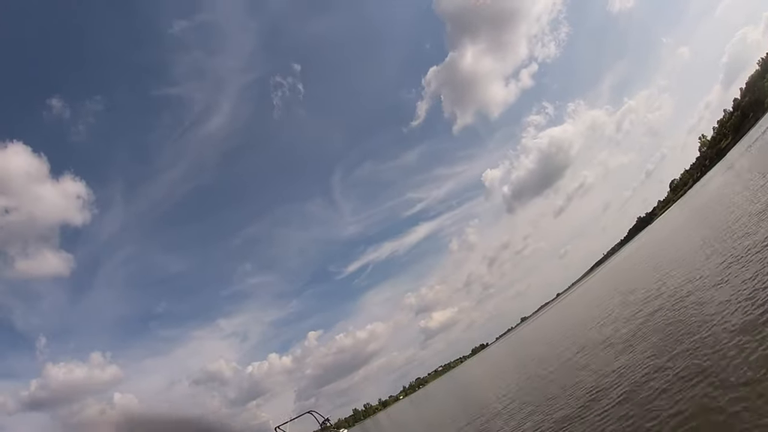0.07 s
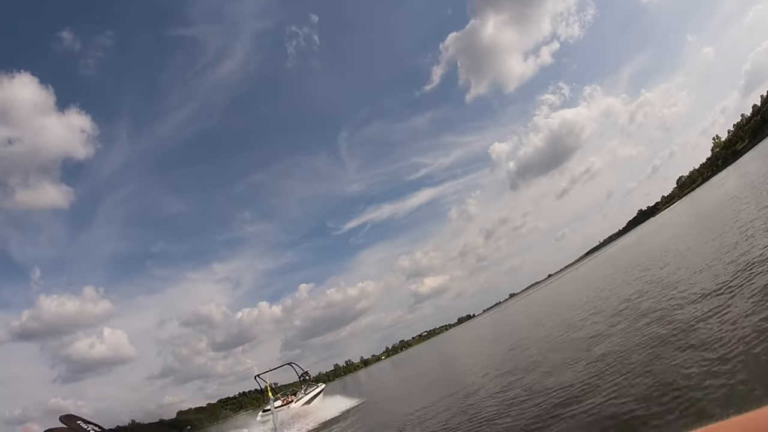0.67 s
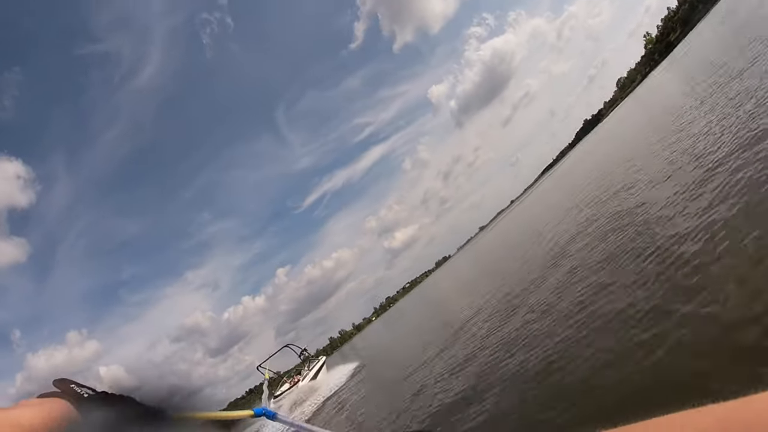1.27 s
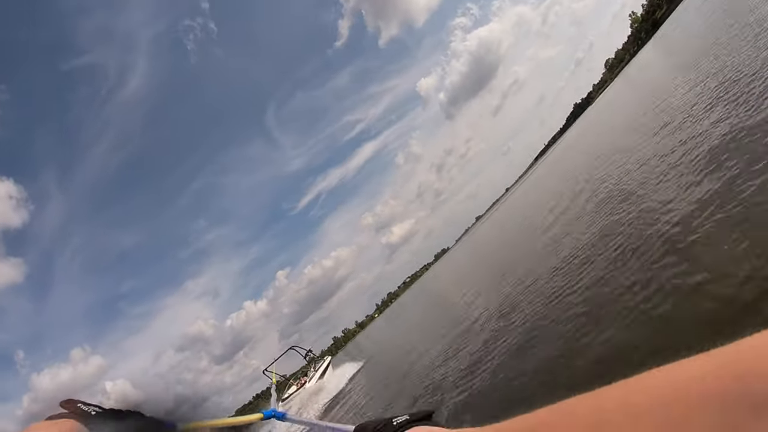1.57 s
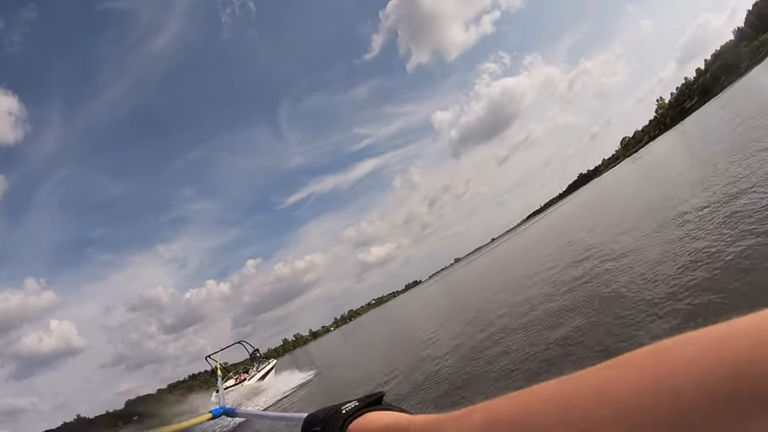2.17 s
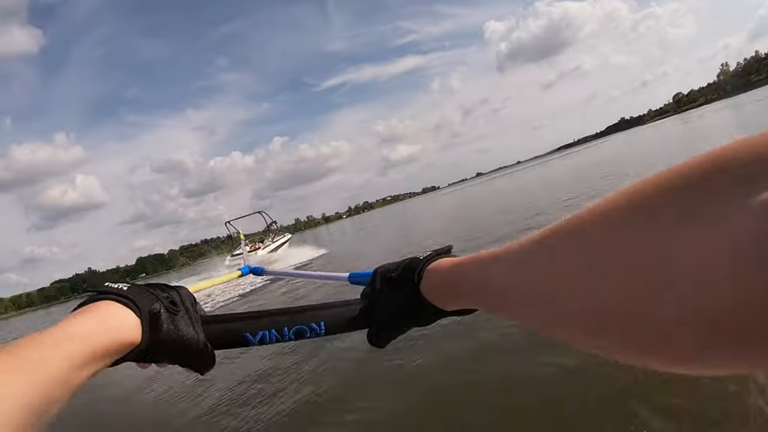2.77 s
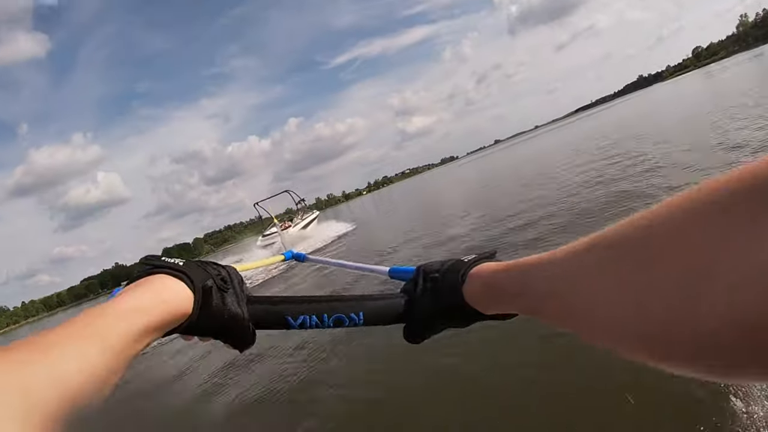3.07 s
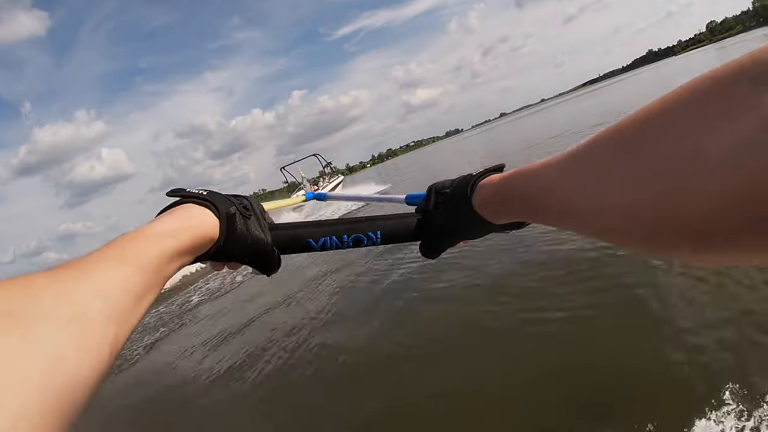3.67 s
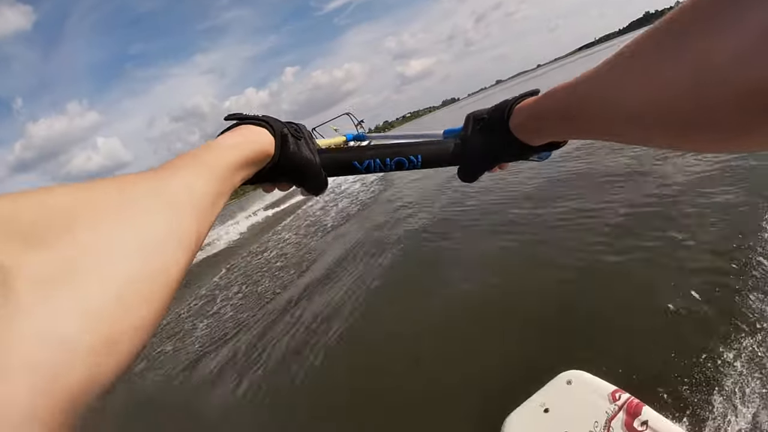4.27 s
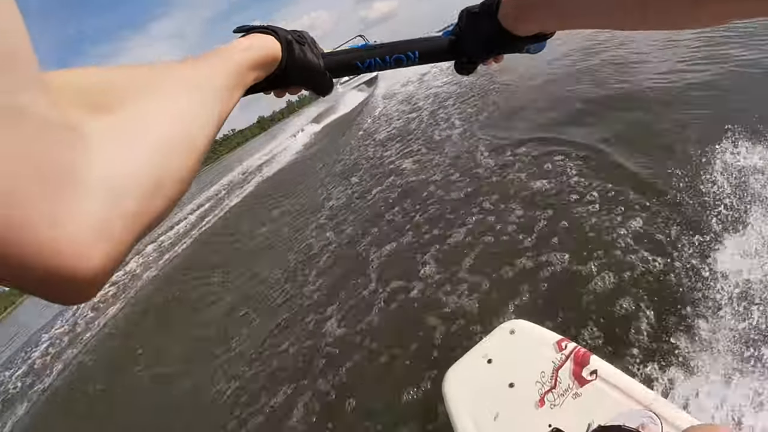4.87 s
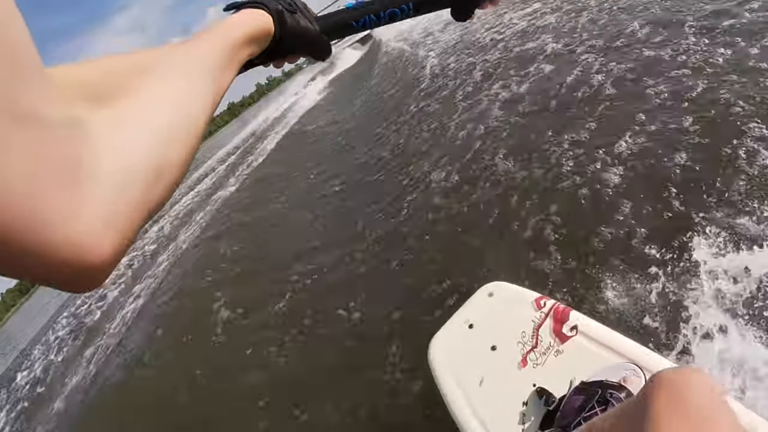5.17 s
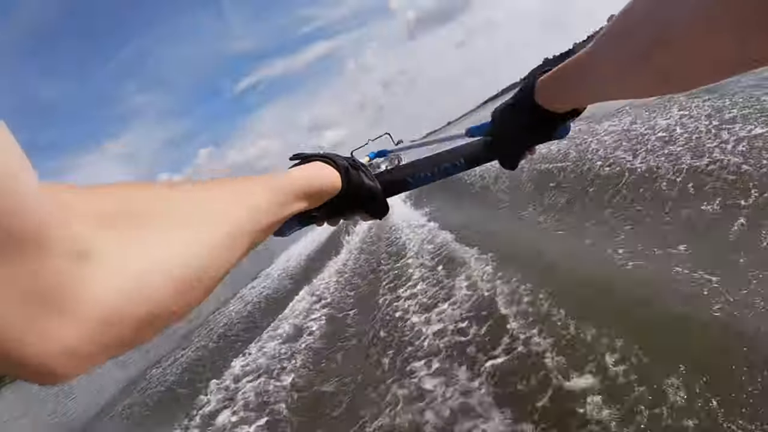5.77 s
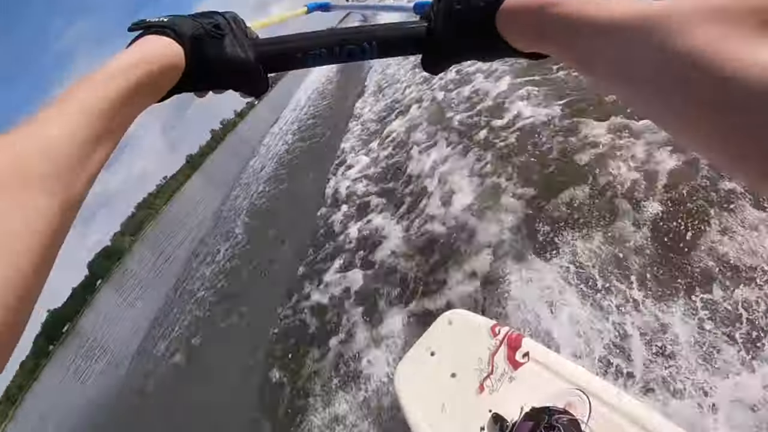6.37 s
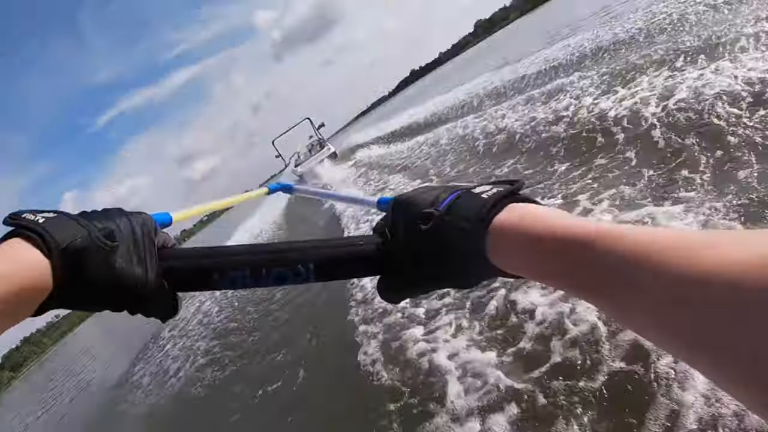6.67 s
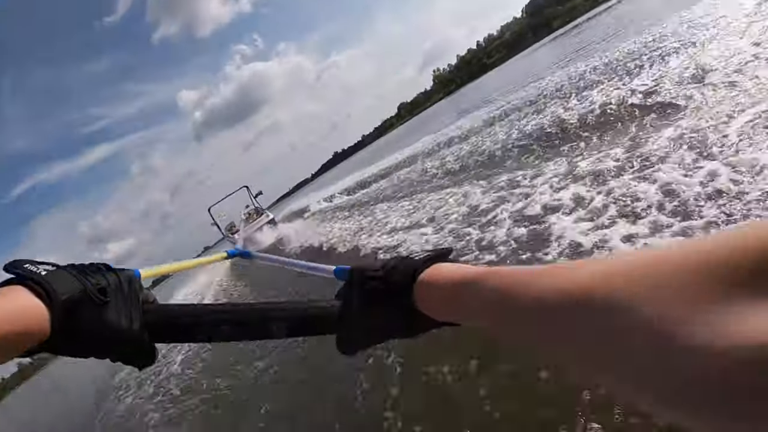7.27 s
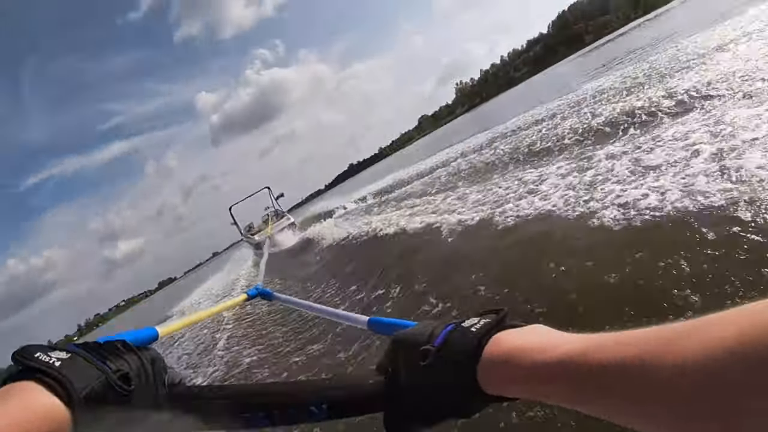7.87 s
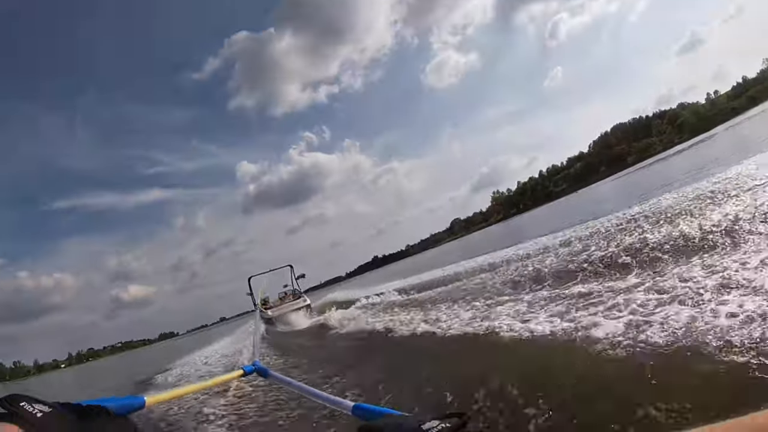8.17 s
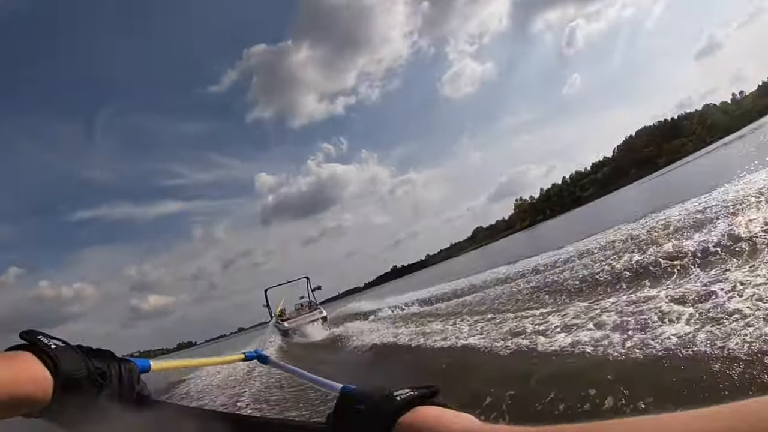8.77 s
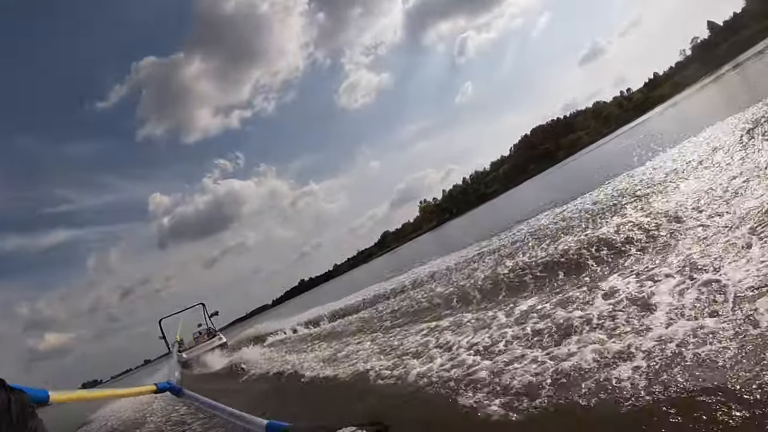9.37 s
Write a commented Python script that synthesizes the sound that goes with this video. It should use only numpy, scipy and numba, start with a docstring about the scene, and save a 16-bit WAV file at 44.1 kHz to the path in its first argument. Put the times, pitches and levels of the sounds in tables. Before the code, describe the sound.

Heard from a microphone worn by a wakeboarder on a lake, a towboat's low, even drone wavers in the rushing air. Water churns and sprays under the board, with scattered gusts and dull thumps. The spray drops away briefly at each of two wake crests, the second with a short rising howl. Afterwards the wind buffets hardest, mixed with slaps and surges of water over the continuing engine.

```python
"""A motorboat engine drones on one low note, fluttering in the rushing air, a thin whine above it.
It tows a wakeboarder across a lake, heard from a camera worn on the body. The board churns water
and throws hissing spray, hushed over the two crests of the wake, with a short howl at the second.
Gusts rumble and buffet the microphone, hardest after the crossing."""
import sys
import numpy as np
from scipy import signal
from scipy.fft import rfft, irfft, next_fast_len
from scipy.io import wavfile
from scipy.ndimage import uniform_filter1d
from numba import njit

SR = 44100
rng = np.random.default_rng(int(sys.argv[2]) if len(sys.argv) > 2 else 0)


def wrap_up_sound(samples):
    """Save the sound to the file named by the first command line argument, as 16-bit audio."""
    columns = np.atleast_2d(samples).T
    # keep every value between -1 and 1, then stretch to whole-number steps
    tamed = np.clip(columns, -1, 1)
    steps = np.round(tamed * 32767).astype(np.int16)
    wavfile.write(sys.argv[1], SR, steps)


N = 415422
TIME = np.arange(N) / SR


def undb(db):
    """Decibels to gain."""
    return 10 ** (np.asarray(db) / 20)


def unit(x):
    """Scale to rms 1."""
    return x / np.sqrt(np.mean(x ** 2))


def curves(table):
    """Each column of a table, interpolated linearly in time."""
    times, *columns = np.transpose(table)
    return [np.interp(TIME, times, column) for column in columns]


def swell(at_s, length_s):
    """Rounded bump of height 1, centred on at_s."""
    return np.exp(-np.minimum(np.abs(2 * (TIME - at_s) / length_s) ** 2.5, 30))


def walk(rate_hz):
    """Random line of rms 1, rate_hz new points a second."""
    steps = rng.standard_normal(2 ** 14)
    return unit(np.interp(TIME * rate_hz, np.arange(len(steps)), steps))


def tint(x, colour):
    """Filter by a (Hz, dB) spectrum, steep above its last point; white noise keeps its power."""
    size = next_fast_len(N + SR // 10)
    hz, db = np.transpose(colour)
    bins_hz = np.maximum(np.arange(size // 2 + 1) * SR / size, 1)
    rolloff = np.minimum(hz[-1] / bins_hz, 1) ** 5
    gain = undb(np.interp(np.log(bins_hz), np.log(hz), db)) * rolloff
    return irfft(rfft(x, size) * unit(gain), size)[:N]


def turbulent(colour, swell_db, swell_hz, grain_db, grain_hz):
    """Coloured noise of rms 1 in swells, each broken into short grains."""
    swells = 2 * np.tanh(walk(swell_hz) / 2)
    grains = 2 * np.tanh(walk(grain_hz) / 2)
    return unit(tint(rng.standard_normal(N), colour) * undb(swell_db * swells + grain_db * grains))


def even_noise(colour):
    """Coloured noise held near rms 1 over a few milliseconds."""
    noise = tint(rng.standard_normal(N), colour)
    power = uniform_filter1d(uniform_filter1d(noise ** 2, size=200), size=200)
    return noise / np.sqrt(power + 1e-9)


def sags(rate_hz, recovery_s, fall_s):
    """Random drops, fast fall and slow recovery; mean 0, rms 1."""
    kicks = (rng.random(N) < rate_hz / SR) * rng.uniform(0.11, 1, N)
    for tau_s in (recovery_s, fall_s, fall_s):
        kicks = signal.lfilter([1], [1, -np.exp(-1 / (tau_s * SR))], kicks)
    return -unit(kicks - kicks.mean())


@njit
def bell(x, hz, gain, width):
    """Boost or cut a moving band; width is a fraction of its centre."""
    y, band, low = np.empty(len(x)), 0., 0.
    for i in range(len(x)):
        tuning = np.tan(np.pi * hz[i] / SR)
        bandpass = (band + tuning * (x[i] - low)) / (1 + tuning * (tuning + width))
        band, low = 2 * bandpass - band, low + 2 * tuning * bandpass
        y[i] = x[i] + (gain[i] - 1) * width * bandpass
    return y


# Firing note between gusts. Each row: time in seconds, level in dB.
NOTE_LEVELS = [(0, -16.5), (.4, -12.5), (.8, -15.5), (1.05, -11), (1.8, -11), (2.4, -13.5), (3.1, -10.5),
               (3.7, -12), (4.05, -15), (4.6, -10), (5.3, -9), (6, -9), (6.6, -11), (7.4, -12), (7.8, -9.5),
               (8.2, -11.5), (8.8, -9.5), (9.42, -14)]
# Dropouts of the note. Each row: centre in seconds, depth 0-1, length in seconds.
NOTE_DIPS = [(0.013, .95, .0095), (0.162, 0.7, 0.039), (0.484, 0.93, 0.014), (3.284, 0.71, 0.025),
             (4, 1, 0.01), (4.883, 0.91, 0.018), (7.185, .89, 0.0065), (8.344, 0.47, .015),
             (9.002, 0.95, 0.01), (9.131, 0.55, 0.02)]
# Noise around the note. Each row: frequency in Hz, relative level in dB.
FLUTTER_SPECTRUM = [(100, -17), (128, -7), (143, -1), (156, 2.5), (172, -3), (181, -9), (190, -3.5),
                    (206, .5), (228, -4.5), (248, -13), (275, -30)]
# Octave above the note. Each row: time in seconds, base level in dB.
OCTAVE_LEVELS = [(0, -47.5), (1.5, -45), (3, -40.5), (4.2, -34), (6.2, -33), (7.5, -34.5), (8.6, -39),
                 (9.42, -35.5)]
# Octave swells. Each row: centre in seconds, length in seconds, rise in dB.
OCTAVE_RISES = [(3.95, 0.61, 8.5), (4.773, 0.29, 7), (5.927, 0.54, 9.5), (6.66, 0.24, 11)]
# Whine, sinking as the rider turns toward the wake. Each row: time in seconds, level in dB.
WHINE_LEVELS = [(0, -37.5), (.9, -39), (1.15, -34.5), (2.5, -42.5), (3.85, -35.5), (5, -44), (5.7, -60),
                (9.42, -54.5)]


def engine(rumble_gain, duck_db, firing_hz=181.35, whine_hz=737):
    """Nearly pure firing note, uneven over eight cylinders, with overtones and a wavering whine."""
    note_db, = curves(NOTE_LEVELS)
    octave_db, = curves(OCTAVE_LEVELS)
    whine_db, = curves(WHINE_LEVELS)
    phase = 2 * np.pi * np.cumsum(firing_hz + .15 * walk(0.96)) / SR
    lope = .11 * np.sin(phase / 8 + .9 * walk(9))
    # Rougher air and a weaker note give more sag and flutter.
    unrest = undb(-20 - 0.37 * note_db) * rumble_gain ** .22
    sag = unrest * undb(-6) * sags(rate_hz=35, recovery_s=.016, fall_s=.0007)
    note = unit(np.sin(phase + lope)) * (undb(note_db - duck_db) + sag)
    flutter = turbulent(FLUTTER_SPECTRUM, swell_db=2, swell_hz=25, grain_db=1, grain_hz=80)
    flutter *= unrest * undb(-2.5)
    dip_gain = np.prod([1 - depth * swell(at, length) for at, depth, length in NOTE_DIPS], axis=0)
    octave_db += sum(db * swell(at, length) for at, length, db in OCTAVE_RISES)
    octave = unit(np.sin(2 * phase + .39 * walk(40))) * undb(octave_db + 2 * walk(30))
    whine = unit(np.sin(2 * np.pi * whine_hz * TIME + .5 * walk(45))) * undb(whine_db + 2.5 * walk(40))
    fourth = unit(np.sin(4 * phase + .5 * walk(8))) * undb(whine_db - 9)  # beats with the whine
    return (note + flutter) * dip_gain + octave + whine + fourth


# Steady airstream. Each row: time in seconds, rumble in dB, flapping in dB before trim.
AIR_LEVELS = [(0, -35.5, -44), (1.4, -45, -50.5), (2.2, -35, -43), (3.2, -39, -38), (4.9, -29.5, -33),
              (5.6, -42, -37.5), (6.6, -27, -32.5), (7.8, -31, -41), (9.42, -26, -35)]
# Gusts. Each row: centre in seconds, length in seconds, rumble in dB, engine note ducking in dB.
AIR_GUSTS = [(0.013, .06, -19.5, 1), (0.25, 0.13, -34, 1), (0.664, 0.2, -22.5, 1), (1.943, 0.062, -27, 1.5),
             (2.43, 0.25, -24.5, 3), (2.736, 0.19, -26, 2.5), (3.423, .1, -35.5, 1), (3.738, 0.055, -28, 0),
             (4.125, 0.083, -28, -0.5), (4.32, 0.19, -24, 2), (5.47, 0.067, -28, -0.5),
             (5.748, .16, -35.5, -0.5), (6.269, 0.18, -23, 4), (6.825, .13, -27.5, 3.5),
             (7.202, 0.099, -20.5, 3), (7.373, 0.16, -25.5, 4.5), (7.55, 0.11, -23.5, 4),
             (8.223, 0.056, -26.5, 1.5), (9.085, 0.17, -30.5, 1.5)]


def airflow(gust_flap_db=-14.5):
    """Airstream plus gusts: rumble gain, flapping gain and ducking of the engine note."""
    rumble_db, flap_db = curves(AIR_LEVELS)
    gust = sum(undb(db) * swell(at, length) for at, length, db, _ in AIR_GUSTS)
    duck_db = sum(db * swell(at, length) for at, length, _, db in AIR_GUSTS)
    rumble_gain = np.hypot(undb(rumble_db), gust)
    flap_gain = np.hypot(undb(flap_db), gust * undb(gust_flap_db))
    return rumble_gain, flap_gain, duck_db


# Large and small eddies. Each row: frequency in Hz, relative level in dB.
RUMBLE_SPECTRUM = [(10, -21.5), (25, 18.5), (48, 19.5), (80, 16.5), (120, 12.5), (200, 11), (330, -47.5)]
FLAP_SPECTRUM = [(130, -25.5), (230, -1.5), (310, 3), (400, -2), (520, -11.5), (900, -54.5)]


def wind(rumble_gain, flap_gain, flap_trim_db=2):
    """Large eddies rumble on the microphone; small ones flap."""
    large = turbulent(RUMBLE_SPECTRUM, swell_db=-1.5, swell_hz=15, grain_db=-1.4, grain_hz=34)
    small = turbulent(FLAP_SPECTRUM, swell_db=3, swell_hz=30, grain_db=1, grain_hz=160)
    return rumble_gain * large + flap_gain * small * undb(flap_trim_db)


# Planing board. Each row: time in seconds, then base churn, splash and spray in dB.
WATER_LEVELS = [(0, -33, -45, -45), (.7, -39, -45.5, -42), (1.4, -36, -46, -48), (2.15, -39, -45.5, -41),
                (2.7, -32.5, -38.5, -43.5), (3.5, -31, -43, -44), (4.3, -33, -48.5, -43.5),
                (5.4, -34, -44, -44.5), (6.4, -32.5, -45.5, -47.5), (7, -38.5, -49, -53.5),
                (7.7, -42, -47.5, -53), (8.6, -39.5, -47.5, -51.5), (9.42, -45.5, -53.5, -55)]
# Wake crests. Each row: rise time in seconds, landing time in seconds, full hush in dB.
CREST_LIFTS = [(5.44, 6.087, 15.5), (6.72, 7.009, 16)]
# Edge digging in. Each row: centre and length in seconds, then churn, splash and spray change in dB.
EDGE_SURGES = [(.63, 0.24, 5.5, 3, -0.5), (2.38, 0.15, 5, -1, -1.5), (2.85, 0.11, -0.5, 0.5, 2.5),
               (5.07, 0.3, 5.5, 3, 2), (6.138, .1, 6, 9.5, 6), (6.45, .32, -0.5, -0.5, 4.5),
               (7.15, 0.27, 8, 6, -3), (9.08, 0.29, 11.5, 9.5, -2.5)]


def board_levels(fade_s=0.42, landing_s=0.013):
    """Churn, splash and spray in dB: the board goes light over crests; its edge throws water."""
    hush_db = sum(db * np.clip((TIME - rises) / fade_s, 0, 1) * np.clip((lands - TIME) / landing_s, 0, 1)
                  for rises, lands, db in CREST_LIFTS)
    hush_shares = [1, 1, 0.44]  # spray hangs in the air
    surge_db = sum(np.outer(change_db, swell(at, length)) for at, length, *change_db in EDGE_SURGES)
    return np.array(curves(WATER_LEVELS)) + surge_db - np.outer(hush_shares, hush_db)


# Water noises. Each row: frequency in Hz, relative level in dB.
CHURN_SPECTRUM = [(250, -6.5), (420, 3), (600, -1), (780, -0.5), (950, -5.5), (1200, -17.5), (2000, -49)]
SPLASH_SPECTRUM = [(600, -24.5), (1050, 2.5), (1500, 1.5), (2200, -5.5), (3200, -15), (6000, -36)]
SPRAY_SPECTRUM = [(900, -13.5), (1800, -4.5), (2800, -1.5), (4200, 1), (5600, 0), (6050, -6), (6700, -12.5),
                  (8100, -20), (10300, -20), (11200, -24), (12100, -24.5), (13200, -40)]
# Hiss colour by stance. Each row: time in seconds, hump in Hz and dB, hollow in Hz and dB.
STANCE_BANDS = [(0, 3160, -1, 4700, -6.5), (1.3, 3050, 3.5, 4700, -4.5), (2.2, 3100, 1, 4520, -3.5),
                (2.7, 2400, 0, 3200, -0.5), (3.3, 2220, 1.5, 3200, -3), (4.3, 2290, 5, 3600, -10),
                (5.3, 2170, 4, 3200, -5.5), (5.85, 2220, 6, 3040, -8), (6.2, 2980, -2.5, 2500, 1),
                (7.5, 2990, 4.5, 2450, -1.5), (9.4, 3090, 5, 2450, 1)]
# Spray turned from the microphone. Each row: time in seconds, shade 0-1.
SPRAY_SHADE = [(0, 0.04), (2.4, 0), (3.2, 0.2), (5.5, 0.17), (5.9, 0.87), (6.5, 0.3), (7.1, 0.7),
               (8.2, 0.59), (9.4, 0.6)]


def water(churn_trim_db=-0.43, splash_trim_db=-1.1, spray_trim_db=1.3, shade_hz=5200, sizzle_hz=5300.):
    """The board churns and splashes the surface and throws a sheet of fine spray."""
    churn_db, splash_db, spray_db = board_levels()
    hump_hz, hump_db, hollow_hz, hollow_db = curves(STANCE_BANDS)
    shade, = curves(SPRAY_SHADE)
    churn = turbulent(CHURN_SPECTRUM, swell_db=1.96, swell_hz=30, grain_db=3, grain_hz=300)
    splash = turbulent(SPLASH_SPECTRUM, swell_db=1.5, swell_hz=45, grain_db=3, grain_hz=380)
    spray = turbulent(SPRAY_SPECTRUM, swell_db=1.05, swell_hz=23, grain_db=1.13, grain_hz=550)
    dull_spray = signal.sosfiltfilt(signal.butter(2, shade_hz, fs=SR, output="sos"), spray)
    spray += shade * (1.24 * dull_spray - spray)
    hiss = splash * undb(splash_db + splash_trim_db) + spray * undb(spray_db + spray_trim_db)
    # Reflections off board and rider lift one band and hollow out another.
    hiss = bell(hiss, hump_hz, undb(hump_db), width=0.19)
    hiss = bell(hiss, hollow_hz, undb(hollow_db), width=0.48)
    sizzle_db = -.4 * np.minimum(hollow_db + 0.5, 0)
    hiss = bell(hiss, np.full(N, sizzle_hz), undb(sizzle_db), width=0.16)
    return churn * undb(churn_db + churn_trim_db) + hiss


# Buffets. Each row: start in seconds, thump in dB, crackle in dB re thump, decay in seconds.
BUFFET_HITS = [(0.58, -23, -9, 0.017), (3.197, -16, -22, 0.015), (3.506, -19.5, -8.5, 0.011),
               (3.719, -20.5, -17, 0.0085), (4.297, -20, -19, .02), (4.932, -19.5, -19, .014),
               (5.034, -21.5, -8, .015), (5.813, -20.5, -16.5, 0.015), (5.881, -20, -17.5, 0.0089),
               (5.936, -23, -11.5, 0.0032), (5.961, -21, -15, 0.0071), (6.082, -15, -11, 0.018),
               (6.202, -17.5, -11, 0.0096), (6.229, -20, -13, 0.0069), (6.255, -19.5, -13, 0.0048),
               (6.721, -20, -21, 0.016), (6.764, -18, -18, 0.016), (6.82, -28, -14, 0.009),
               (7.01, -25, -10, .008), (7.027, -16, -6.5, 0.017), (7.074, -21, -8, .006),
               (7.088, -20, -7, .008), (7.121, -18, -4, 0.0038), (7.147, -19.5, -8, 0.013),
               (7.192, -28, -6.5, 0.011), (7.372, -27, -10, 0.0067), (7.482, -19, -10.5, 0.012),
               (7.522, -23, -10, .015), (7.656, -24, -13.5, 0.0086), (7.975, -17.5, -21, 0.0091),
               (8.332, -24, -14.5, .014), (8.507, -18.5, -10.5, 0.02), (8.581, -24, -11, 0.013),
               (8.849, -20.5, -12.5, 0.0066), (8.915, -21, -5, 0.012), (8.933, -18.5, -3.5, 0.0081),
               (8.998, -18.5, -17, 0.018), (9.091, -22.5, -5.5, 0.011), (9.147, -20.5, -8, 0.013),
               (9.207, -22.5, -11, 0.022), (9.344, -16.5, -15, 0.0057), (9.381, -30, -13, .008)]
# Buffet noises. Each row: frequency in Hz, relative level in dB.
THUMP_SPECTRUM = [(40, -6), (150, 3.5), (350, 3.5), (700, -9), (1200, -26.5), (3000, -66.5)]
CRACKLE_SPECTRUM = [(350, 4), (800, 3.5), (1400, -2.5), (2500, -14), (4000, -26.5), (6500, -44.5)]


def buffets():
    """Sharp gusts and slaps of water: a dull thump with a crackle on top."""
    thump_gain, crackle_gain = np.zeros(N), np.zeros(N)
    for start_s, thump_db, crackle_db, decay_s in BUFFET_HITS:
        start = int(start_s * SR)
        span = slice(start, min(start + SR // 10, N))
        age = np.maximum(TIME[span] - start_s, 0) / decay_s
        push = undb(thump_db) * np.tanh(12 * age) * np.exp(-age ** 2)
        thump_gain[span] += push
        crackle_gain[span] += push * undb(crackle_db)
    return thump_gain * even_noise(THUMP_SPECTRUM) + crackle_gain * even_noise(CRACKLE_SPECTRUM)


def howl(centre_s=6.74, half_width_s=0.084, centre_hz=395, glide_per_s=2.0, peak_db=-28):
    """A short, rough howl glides upward as the rider comes over the wake."""
    offset_s = np.clip(TIME - centre_s, -.5, .5)
    pitch_hz = centre_hz * np.exp(glide_per_s * offset_s)
    phase = 2 * np.pi * np.cumsum(pitch_hz) / SR + .3 * walk(60)
    return undb(peak_db) * np.exp(-(offset_s / half_width_s) ** 2) * np.sin(phase)


def scene():
    """All sources reach one microphone through the same moving air."""
    rumble_gain, flap_gain, duck_db = airflow()
    mix = engine(rumble_gain, duck_db) + wind(rumble_gain, flap_gain) + water() + buffets() + howl()
    return mix[None]


def record(dry, threshold=0.53, strength=0.6, response_s=0.0075, knee=.58, headroom=.14, top_hz=15700):
    """Camera chain: limiter, soft clip, steep low-pass."""
    envelope = np.abs(signal.hilbert(dry, next_fast_len(N))[:, :N])
    excess = np.maximum(envelope / threshold - 1, 0)
    pole = np.exp(-1 / (response_s * SR))
    limited = dry / (1 + strength * signal.lfilter([1 - pole], [1, -pole], excess))
    over = np.maximum(np.abs(limited) - knee, 0)
    rounded = limited - np.sign(limited) * (over - headroom * np.tanh(over / headroom))
    return signal.sosfilt(signal.ellip(8, .2, 70, top_hz, fs=SR, output="sos"), rounded)


dry = scene()
out = record(dry)
wrap_up_sound(out)
```